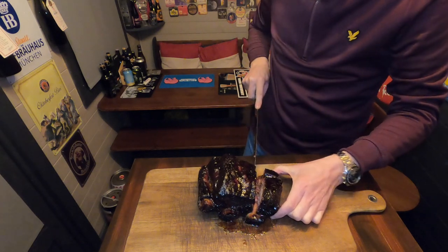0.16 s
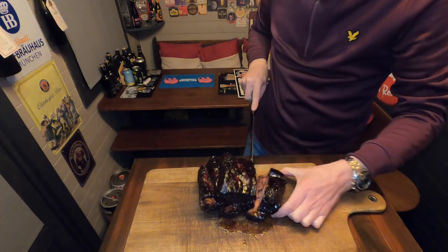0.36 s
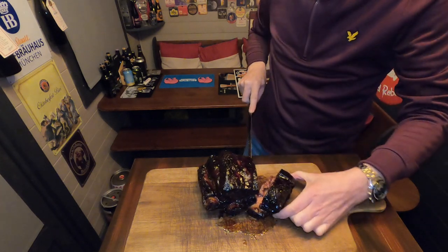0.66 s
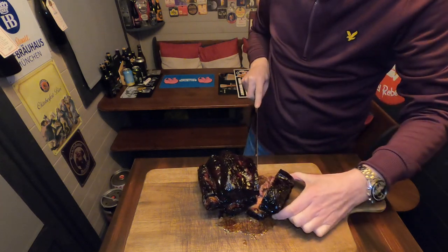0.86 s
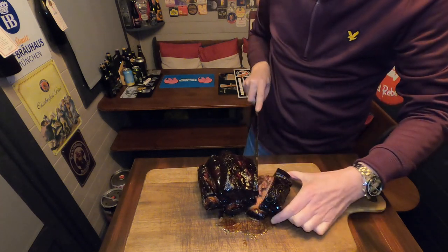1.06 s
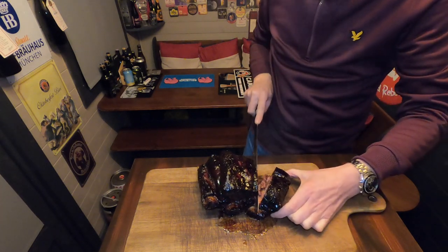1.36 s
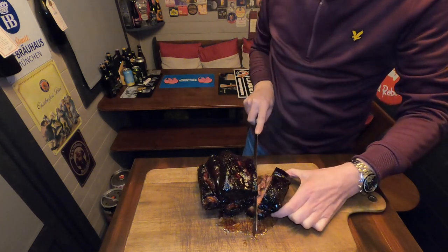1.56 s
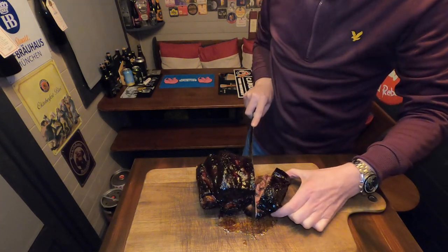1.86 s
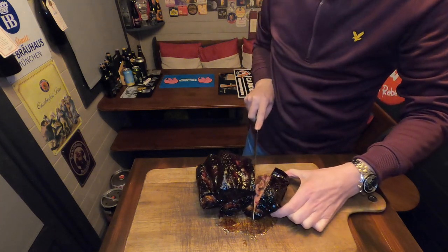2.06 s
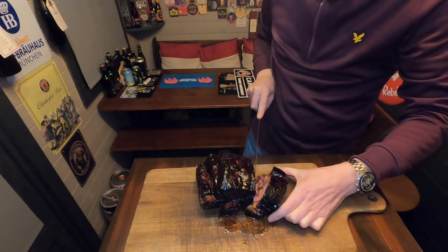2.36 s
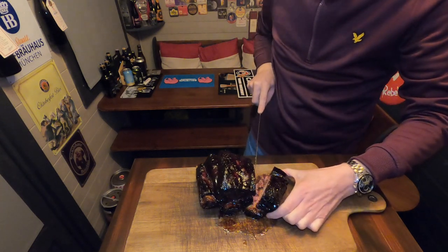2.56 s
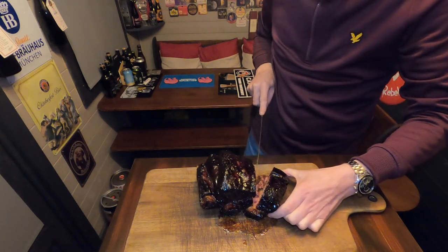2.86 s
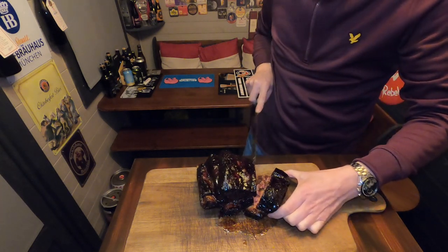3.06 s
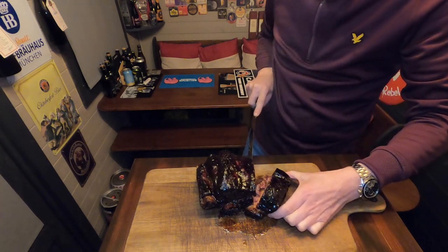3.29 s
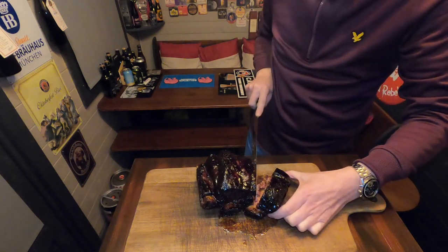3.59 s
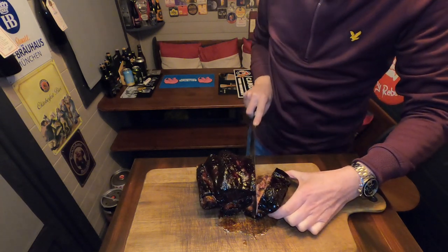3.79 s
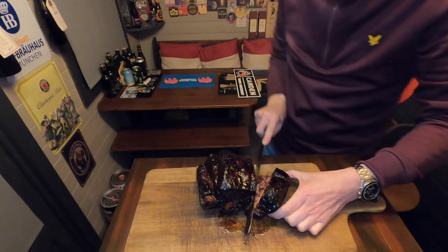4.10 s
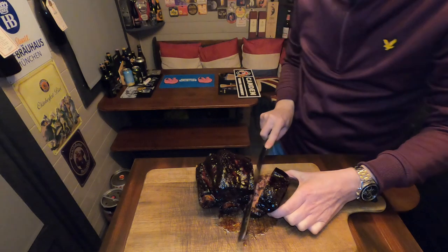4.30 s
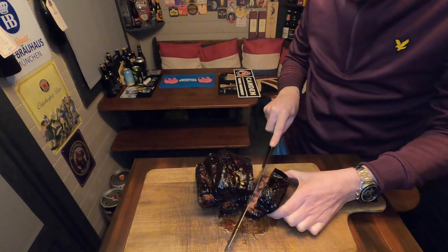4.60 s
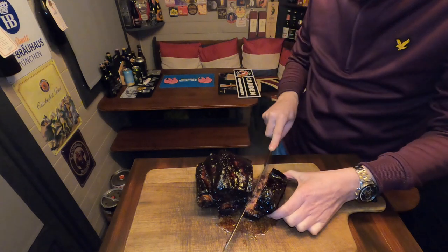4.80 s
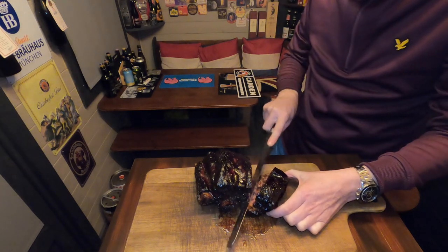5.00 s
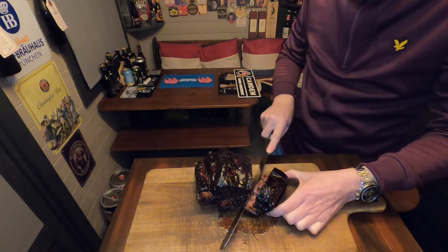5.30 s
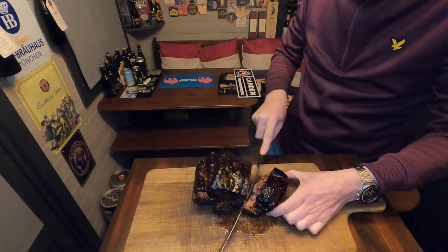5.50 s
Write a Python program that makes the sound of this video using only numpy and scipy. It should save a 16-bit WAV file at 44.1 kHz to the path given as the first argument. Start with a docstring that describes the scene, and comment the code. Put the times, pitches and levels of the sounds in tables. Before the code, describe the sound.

A serrated knife saws in uneven strokes through sticky glazed ribs on a wooden board. The meat rasps, the blade hisses and the board rumbles, while glaze and gristle give small snaps and faint pops. Midway the steel scrapes along bone with a thin ring, then the edge knocks the wood several times. The microphone is close, in a quiet kitchen with a faint hum.

```python
"""A serrated knife rasps through sticky glazed ribs on a wooden board; kitchen, microphone close by
on the same table. Teeth catch and slip: the board rumbles, the meat rasps, the blade hisses, and its
flat sings along bone. Glaze and gristle snap, bubbles pop, the edge knocks the wood. Underneath, the
pushed table rocks the microphone, mostly below hearing, and the quiet room hums."""
import sys
import numpy as np
from scipy import signal
from scipy.fft import rfft, irfft
from scipy.io import wavfile
from scipy.ndimage import uniform_filter1d

SR = 44100
rng = np.random.default_rng(int(sys.argv[2]) if len(sys.argv) > 2 else 0)


def output_pcm(signal):
    """Save a mono or channel-first signal as 16-bit PCM at the path in sys.argv[1].

    Samples are clipped to [-1, 1] before scaling.
    """
    pcm = np.clip(np.atleast_2d(signal).T, -1, 1) * 32767
    wavfile.write(sys.argv[1], SR, np.round(pcm).astype(np.int16))


N = 249164
TIME = np.arange(N) / SR

# modes of the wooden board: f/Hz, width/Hz, gain/dB
BOARD_MODES = [(88.4, 17.5, -4), (140, 16.3, 3.5), (174, 32, -2), (227.1, 46.7, -1.5), (357.7, 37.5, -3.5),
               (470, 31.5, -4), (619, 105, -11.5), (791, 99, -11), (950, 52, -22.5), (1077, 40, -18)]
# resonances of the rasping meat: f/Hz, width/Hz, gain/dB
MEAT_MODES = [(1264, 580, -1), (1724, 253, 2.5), (2120, 300, 1.5), (2620, 260, -3), (3100, 403, -0.5),
              (4060, 1300, -6), (4560, 1800, -4.5)]


def sawing():
    """The same catching teeth drive board, meat and blade; the grip tightens and slackens for all."""
    # share of the board's lowest mode, stronger when pressed to the table: t/s, gain/dB
    pressing = [(0.0, -1), (1.5, -12), (2.4, 3.5), (3.2, -4), (4.2, 3.5), (5.0, 0), (5.65, 1)]
    # share of the rasp that rings the board's upper modes: t/s, gain/dB
    wood_share = [(0.0, -2), (0.6, -0.5), (1.5, -7), (2.2, -7), (2.7, -11), (4.4, -9), (5.0, -5.5),
                  (5.65, -6)]
    # share of the rasp's highest modes: t/s, gain/dB
    top_share = [(0.0, -2.5), (0.5, -9), (1.55, -11.5), (2.5, -8), (3.8, -2), (4.2, -7), (5.65, -4.5)]
    # resonances of the hissing blade: f/Hz, nominal width/Hz, gain/dB
    blade_modes = [(6370, 1020, 7), (6760, 190, 7), (7520, 880, 6), (7630, 300, -4), (8100, 340, 0),
                   (9490, 1600, -1), (11130, 340, 1), (12640, 1740, 1), (15400, 860, -10)]
    meat_gain, board_gain, blade_gain = strokes()
    grip, teeth = walk(90), slips(2500, spread_db=3.5)
    # tearing fibres and glaze add finer slips of their own
    fibres = unit(teeth + 0.5 * slips(9000, spread_db=0.78))
    glaze = unit(0.6 * teeth + slips(12000, spread_db=3.5))
    drive = board_gain * undb(0.6 * grip) * teeth
    lowest = envelope(pressing) * body(drive, BOARD_MODES[:1])
    higher = ring(body(drive, BOARD_MODES[1:]), 256, 1000)
    rumble = (lowest - higher) / np.std(body(teeth, BOARD_MODES))
    wood = envelope(wood_share) * patchy(fibres, BOARD_MODES[-2:])
    top = envelope(top_share) * patchy(fibres, MEAT_MODES[-2:])
    rasp = meat_gain * undb(1.13 * grip) * (patchy(fibres, MEAT_MODES[:-2]) + top + wood)
    hiss = blade_gain * undb(1.4 * grip) * patchy(glaze, blade_modes)
    return rumble + rasp + hiss


def strokes():
    """Gains of meat, board and blade: each stroke swells and fades over a faint resting contact."""
    # knife strokes: start/s, rise/s, fall/s, meat/dB, board/dB, blade/dB
    cuts = [(-0.06, 0.1, 0.15, -53.5, -50.5, -63), (0.272, 0.14, 0.27, -58, -49, -70),
            (0.543, 0.017, 0.036, -64, -74, -58), (0.08, 0.04, 0.12, -65.5, -63, -71),
            (0.58, 0.091, 0.15, -79, -66, -80), (0.7, 0.13, 0.039, -64, -59.5, -70),
            (1.19, 0.048, 0.026, -64, -63, -79), (1.461, 0.0084, 0.27, -51.5, -47, -63.5),
            (1.479, 0.088, 0.079, -49, -45, -57), (1.58, 0.065, 0.088, -86, -58, -82),
            (1.659, 0.099, 0.1, -55, -49, -67), (1.919, 0.0031, 0.052, -57.5, -54, -54.5),
            (1.931, .05, 0.039, -56, -52.5, -69), (2.01, 0.041, 0.056, -66, -61, -68.5),
            (2.12, 0.17, 0.22, -63, -57.5, -67), (2.25, 0.22, 0.22, -85, -61, -84),
            (2.399, 0.15, 0.074, -73.5, -58.5, -84), (2.6, 0.046, 0.05, -62, -65, -78),
            (2.702, 0.065, 0.14, -60.5, -59, -56.5), (2.82, 0.13, 0.023, -54, -71, -48),
            (2.98, 0.035, 0.058, -64.5, -78, -67), (3.173, 0.0086, 0.059, -60.5, -45, -73),
            (3.18, 0.039, 0.29, -62.5, -60, -67.5), (3.25, 0.14, 0.5, -72, -69, -74),
            (3.565, .02, 0.042, -67, -56, -88), (3.52, 0.17, 0.13, -62.5, -54, -88),
            (3.797, .015, 0.06, -50.5, -42.5, -68), (3.832, 0.04, 0.46, -71.5, -54.5, -76),
            (3.982, 0.0033, 0.12, -71, -42.5, -71), (4.0, 0.055, 0.078, -59.5, -52.5, -65.5),
            (4.07, 0.039, .04, -59, -52, -64), (4.08, 0.11, 0.073, -52, -44, -57.5),
            (4.16, 0.075, 0.28, -58, -56.5, -65.5), (4.37, 0.019, 0.034, -50.5, -58.5, -58),
            (4.29, 0.12, 0.046, -56.5, -54.5, -65), (4.44, 0.017, 0.15, -71, -55.5, -87),
            (4.66, 0.054, 0.091, -67, -60.5, -75), (4.753, 0.016, 0.065, -76, -54, -94),
            (4.903, 0.13, 0.046, -59.5, -52.5, -68), (5.112, 0.041, 0.045, -69.5, -73.5, -78),
            (5.202, 0.011, 0.065, -55.5, -53.5, -61.5), (5.239, 0.029, 0.18, -60, -59, -69),
            (5.28, .14, 0.03, -58.5, -58, -68), (5.435, 0.0037, 0.2, -51.5, -39, -59),
            (5.449, 0.076, 0.12, -50.5, -45, -64)]
    resting_db = -78.5, -74.5, -80.5  # meat, board, blade
    fade_db, rounding = 22.5, 1.41  # drop over one rise or fall time; exponent that rounds the top
    power = np.repeat(undb(resting_db)[:, None] ** 2, N, axis=1)
    for start, rise, fall, *levels_db in cuts:
        span = slice(max(int((start - rise) * SR), 0), int((start + rise + 2 * fall) * SR))
        past_peak = TIME[span] - start - rise
        away = np.where(past_peak < 0, -past_peak / rise, past_peak / fall)
        power[:, span] += undb(np.array(levels_db)[:, None] - fade_db * away ** rounding) ** 2
    return np.sqrt(power)


def snaps():
    """Glaze and gristle break: a broad tick, a short crackling tail and a high band on top."""
    # snaps: t/s, peak/dB, centre/Hz, treble share/dB, crackling tail/dB
    breaks = [(0.042, -36.5, 1110, -29, -23), (0.557, -40.5, 1840, -1, -11), (0.7564, -46.5, 4500, 4, -4),
              (0.909, -50, 1900, 4, -15), (1.2313, -47.5, 1700, -30, -7.5), (1.3085, -51.5, 1380, -8, -17),
              (1.498, -34.5, 2370, -24, -6), (1.624, -52, 2160, 6, -9), (1.7207, -46, 2080, -14, -5),
              (1.8147, -42, 2030, -30, 3), (1.8821, -39.5, 1600, -11, -17),
              (1.9213, -21.5, 1968, -5.5, -21), (1.9707, -40, 2300, -15, -3), (2.034, -50, 2127, -11, -16),
              (2.0553, -48, 2050, -3, -5), (2.0683, -49, 2080, -10, -5), (2.4524, -52.5, 3140, -7, -3),
              (2.537, -46, 4920, -16.5, -13), (2.559, -47, 3100, -1, -10), (2.587, -41.5, 4250, -11.5, -15),
              (2.778, -41.5, 2040, -4, -11), (2.95, -29.5, 6730, -5, -15), (2.961, -34.5, 2200, -16, -8),
              (3.2263, -37, 2000, -9, 7), (3.9864, -40.5, 1730, 0, -17), (4.0529, -39.5, 2080, -7, -12),
              (4.1004, -39.5, 2100, -8, 5), (4.1729, -43, 2460, -27, -14), (4.3246, -44, 1740, -7, -10),
              (4.3844, -37.5, 2000, -28, -11), (4.407, -42, 6350, -15, -13), (4.4685, -42, 2150, -26, 0),
              (4.596, -58, 5160, -17, -8), (4.7097, -46.5, 2840, -12, -5), (4.77, -51, 2450, -15, -3),
              (4.7842, -44, 2080, -22, 8), (5.234, -41, 1530, -20, -6), (5.4384, -29, 7600, -22, -13),
              (5.463, -28, 3420, -34, -31)]
    out, t = np.zeros(N), TIME[:2048]
    tick = 1.0 * (t == 0)
    tick[int(0.0011 * SR)] = 0.25  # echo off the board
    for start, db, hz, treble_db, tail_db in breaks:
        tail = undb(tail_db) * rng.standard_normal(len(t)) * np.exp(-t / 0.0024)
        crack = ring(tick, hz, 1.1 * hz) + 1.5 * ring(tail, hz, 0.35 * hz)
        low = ring(crack, hz, 1.6 * hz) + 0.12 * body(tick + tail, MEAT_MODES)
        high = ring(tick + tail, 15400, 5800)
        place(out, start, at_peak(low) + at_peak(high, treble_db), db)
    return out


def knocks():
    """The edge hits the board and rings its modes; a hard, dry contact adds a clack."""
    # knocks: t/s, peak/dB, hardness/Hz, clack share/dB
    hits = [(1.464, -38, 500, -28), (3.179, -36, 610, -9.5), (3.202, -36.5, 940, 31), (3.805, -42, 490, -2),
            (3.991, -37, 895, 9), (4.177, -47, 686, -16), (4.386, -44.5, 800, 7), (5.208, -42.5, 694, -5),
            (5.44, -31, 656, -4.5)]
    out, t = np.zeros(N), TIME[:8192]
    for start, db, hz, clack_db in hits:
        push = np.exp(-t * hz * 2 * np.pi) * t * hz
        thud = body(-push, BOARD_MODES)
        # the board chatters briefly on the table
        chatter = rng.standard_normal(len(t)) * np.minimum(t / 0.0016, 1) * np.exp(-t / 0.015)
        clack = ring(chatter, hz, 0.76 * hz, 0.71 * hz)
        place(out, start, at_peak(thud) + at_peak(clack, clack_db), db)
    return out


def blade_on_bone():
    """Rubbing on bone feeds the steel's narrow modes; the lowest drops as more blade comes free."""
    # the slide along bone: t/s, level/dB
    slide_levels = [(2.72, -102), (2.77, -64), (2.96, -58.5), (3.0, -67), (3.17, -84), (3.25, -65.5),
                    (3.55, -66), (3.78, -68.5), (4.1, -61), (4.4, -62.5), (4.48, -80)]
    # modes of the singing steel: f/Hz, nominal width/Hz, gain/dB
    steel_modes = [(2010, 80, 1), (2200, 90, -5), (2900, 90, -2), (3960, 180, -8), (4650, 170, -10),
                   (5460, 220, -10), (6080, 220, -12), (6990, 200, -11), (7990, 250, -13)]
    draw_s, draw_hz = (2.74, 2.82, 2.91, 2.93), (1700, 1500, 1450, 1265)
    rub = rng.standard_normal(N)
    song = sum(undb(db + 2 * walk(40)) * unit(ring(rub, hz, 1.5 * width, 2.5 * width))
               for hz, width, db in steel_modes)
    waver = uniform_filter1d(rng.standard_normal((2, N)), size=SR // 90)
    phase = 2 * np.pi * np.cumsum(np.interp(TIME, draw_s, draw_hz)) / SR
    lowest = unit(waver[0] * np.cos(phase) + waver[1] * np.sin(phase))
    lowest_db = np.where(TIME < draw_s[-1] + 0.1, 3, -2)  # drawn out, then lying on bone
    return envelope(slide_levels, left=-120, right=-120) * unit(song + undb(lowest_db) * lowest)


def glaze_pops():
    """Each larger bubble bursts with one tick and a tiny spit of noise in a high band."""
    # bursting bubbles: t/s, peak/dB, centre/Hz
    bubbles = [(0.2973, -56, 8900), (0.5225, -50.5, 12000), (0.9448, -55, 14000), (1.515, -46, 13500),
               (1.5773, -48, 12500), (1.6801, -51, 13300), (1.7754, -52, 12900), (1.873, -50, 9590),
               (2.079, -56, 14000), (2.1066, -56, 14200), (2.2787, -60, 12500), (2.606, -49, 13500),
               (2.7342, -52, 12000), (4.0198, -55, 13000), (5.4176, -49, 12000)]
    out, t = np.zeros(N), TIME[:512]
    for start, db, hz in bubbles:
        burst = 0.37 * rng.standard_normal(len(t)) * np.exp(-t / 0.0012)
        burst[0] += 1
        place(out, start, ring(burst, hz, 0.45 * hz, 0.6 * hz), db)
    return out


def glaze_crackle():
    """Tiny bubbles of glaze pop at random in four high bands."""
    return undb(-81) * sum(ring(slips(30, spread_db=4), hz, 0.4 * hz, 0.6 * hz)
                           for hz in (4970, 8000, 12000, 14060))


def table_sway():
    """The pushed table rocks the microphone at its lowest modes."""
    # sway at the microphone: t/s, level/dB
    sway_levels = [(0.0, -59), (0.7, -48.5), (1.76, -48), (2.0, -55), (3.0, -58.5), (3.4, -51), (3.76, -41),
                   (3.88, -48.5), (4.02, -39), (4.26, -36), (4.45, -42.5), (5.36, -36), (5.44, -51),
                   (5.65, -47)]
    # modes of the table: f/Hz, width/Hz, gain/dB
    table_modes = [(9.86, 1.48, 5), (15.6, 3.63, -8), (31.5, 6.9, -43.5), (75.5, 61, -37.5)]
    return envelope(sway_levels) * unit(body(rng.standard_normal(N), table_modes))


def room_tone():
    """Steady hum and hiss of the kitchen, well behind the knife."""
    # room spectrum: f/Hz, relative density/dB
    spectrum = [(12, -30), (20, -52), (34, -8), (55, -4.5), (90, -2.5), (137, -40), (308, -18),
                (354, -21.5), (672, -22), (1110, -29.5), (8270, -37), (15700, -39.5)]
    hz, db = np.transpose(spectrum)
    bins_hz = np.maximum(np.fft.rfftfreq(N, 1 / SR), 1)
    shape = undb(np.interp(np.log(bins_hz), np.log(hz), db, left=-80))
    gain = undb(-66.5 + 0.073 * walk(0.15))
    return gain * unit(irfft(rfft(rng.standard_normal(N)) * shape, N))


def undb(db):
    """Decibels to gain."""
    return 10 ** (np.asarray(db) / 20)


def unit(x):
    """Scaled to rms 1."""
    return x / np.sqrt(np.mean(x ** 2))


def at_peak(x, db=0):
    """Scaled to a peak level."""
    return x * undb(db) / np.abs(x).max()


def envelope(points, **ends):
    """Gain over time through points of t/s, level/dB."""
    return undb(np.interp(TIME, *np.transpose(points), **ends))


def place(out, start, x, db):
    """Adds a short sound to the track at its peak level."""
    i = int(start * SR)
    out[i:i + len(x)] += at_peak(x[:N - i], db)


def ring(x, hz, *widths_hz):
    """One resonance per width, in series; gain 1 at the centre."""
    for width in widths_hz:
        x = signal.lfilter(*signal.iirpeak(hz, hz / width, fs=SR), x)
    return x


def body(x, modes):
    """A body's resonances side by side, neighbours in opposite phase."""
    return sum((-1) ** k * undb(db) * ring(x, hz, width) for k, (hz, width, db) in enumerate(modes))


def patchy(x, modes):
    """Steep resonances, each favoured or damped in turn as the contact moves."""
    return unit(sum((-1) ** k * undb(db + 2.1 * walk(35)) * ring(x, hz, 1.5 * width, 3 * width)
                    for k, (hz, width, db) in enumerate(modes)))


def walk(rate_hz):
    """Random levels, each gliding into the next; rms 1."""
    hold = int(SR / rate_hz)
    steps = np.repeat(rng.standard_normal(N // hold + 1), hold)
    return unit(uniform_filter1d(steps, hold)[:N])


def slips(per_second, spread_db):
    """Random impulses, a few much bigger than the rest."""
    hit = rng.random(N) < per_second / SR
    size_db = spread_db * np.minimum(rng.exponential(size=N), 3)
    return unit(hit * rng.choice([-1, 1], N) * undb(size_db))


def scene():
    """The knife up close with a short kitchen echo, over table sway and room tone; mono."""
    knife = sawing() + blade_on_bone() + glaze_crackle() + glaze_pops() + snaps() + knocks()
    echo_t60_s, echo_db = 0.2, -13
    t = TIME[:16384]
    tail = rng.standard_normal(len(t)) * np.exp(-np.log(1000) * t / echo_t60_s) * (t > 0.004)
    tail *= undb(echo_db) / np.sqrt(np.sum(tail ** 2))
    echo = signal.fftconvolve(knife, tail)[:N]
    return (knife + echo + table_sway() + room_tone())[None]


def record(dry):
    """The recorder cuts the top steeply above 15750 Hz."""
    return signal.sosfilt(signal.ellip(10, 0.2, 60, 15750, fs=SR, output="sos"), dry)


dry = scene()
out = record(dry)
output_pcm(out)
```